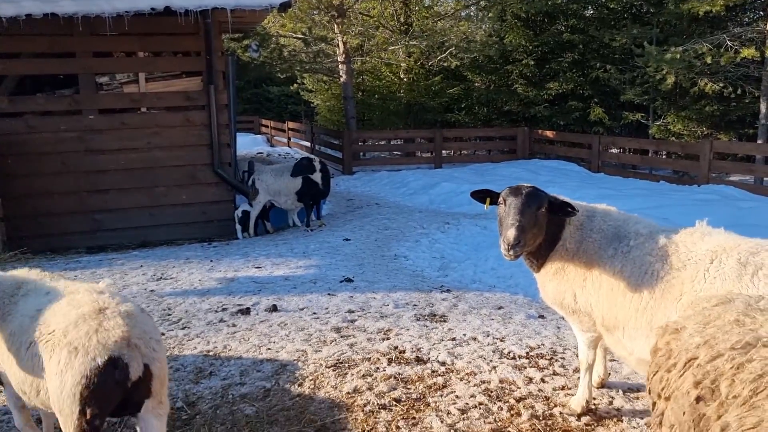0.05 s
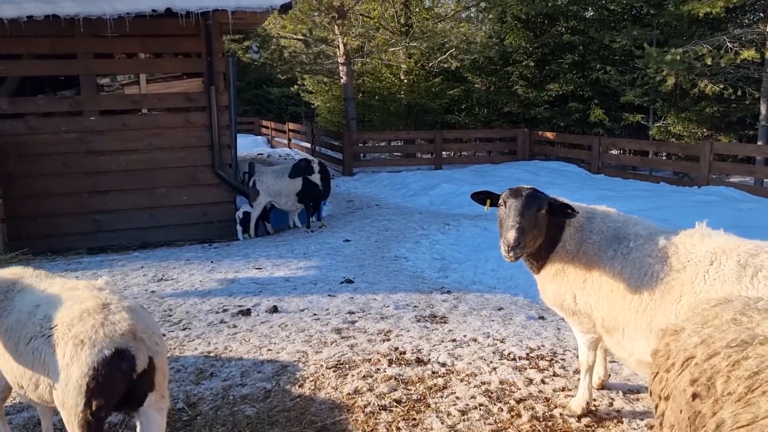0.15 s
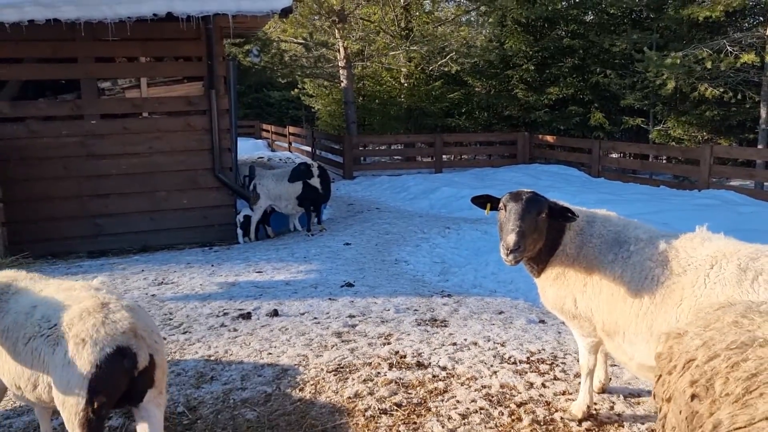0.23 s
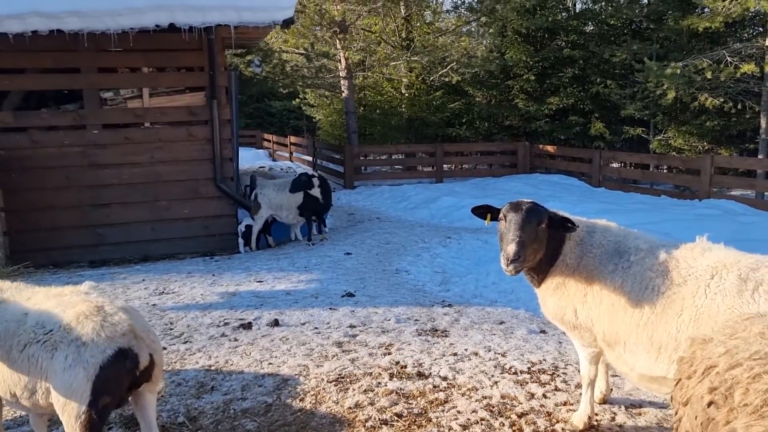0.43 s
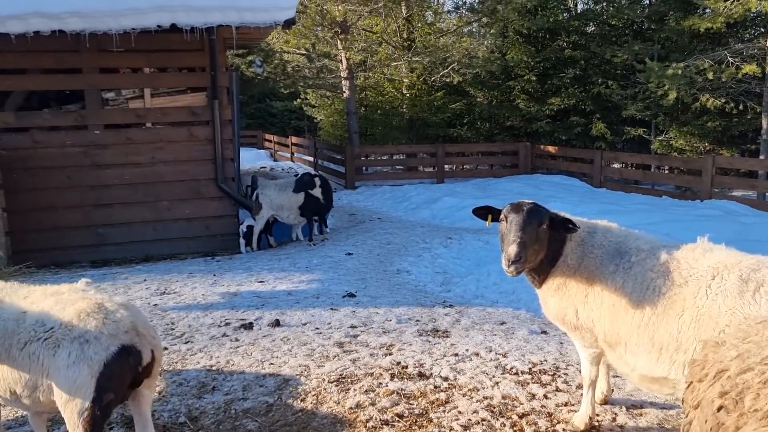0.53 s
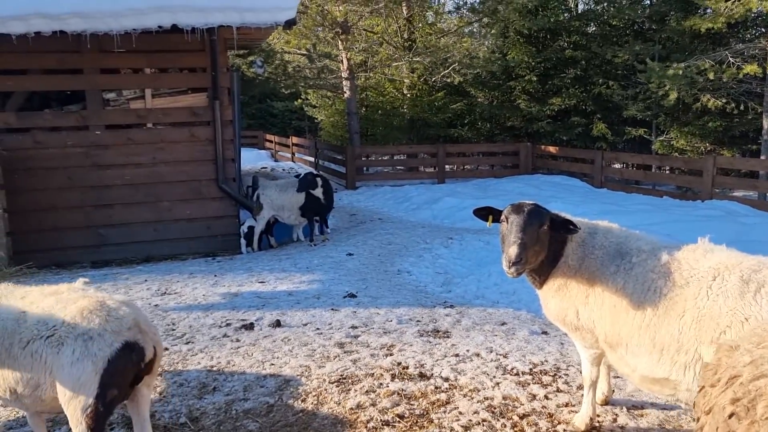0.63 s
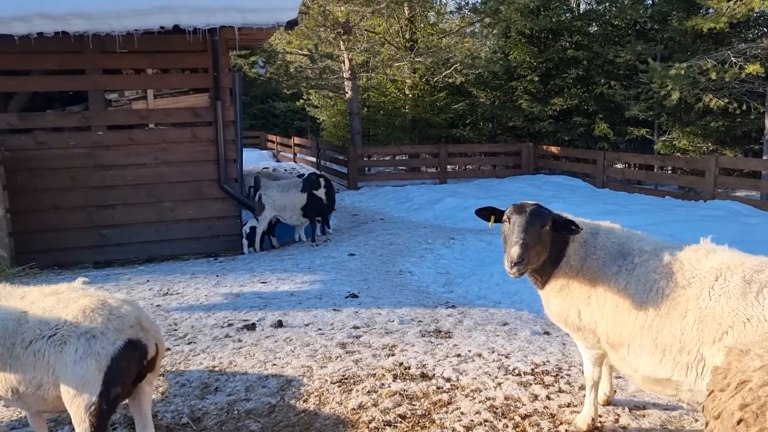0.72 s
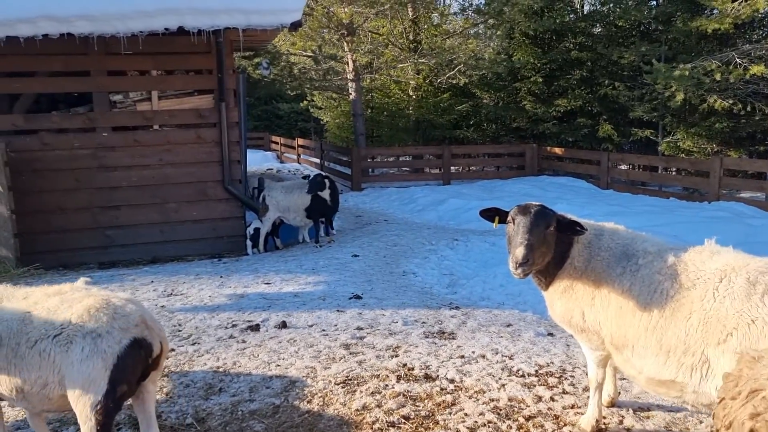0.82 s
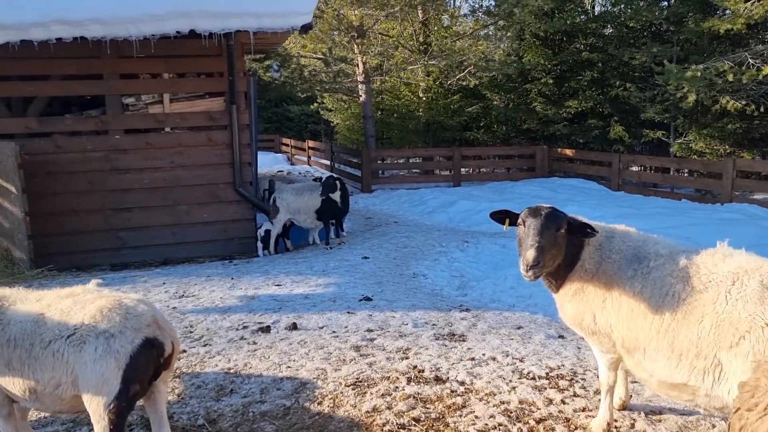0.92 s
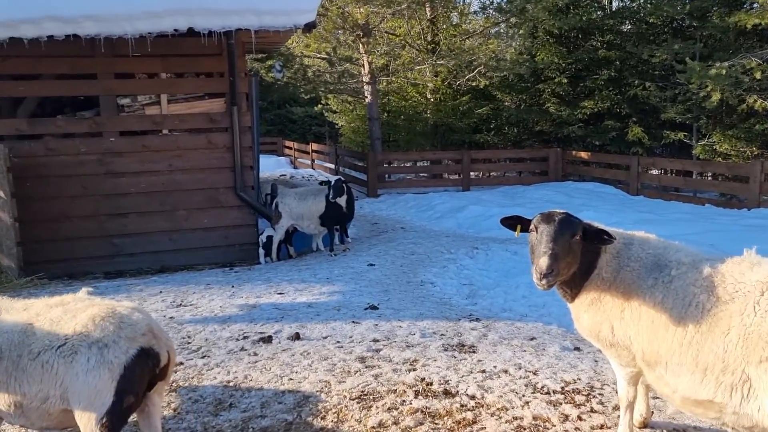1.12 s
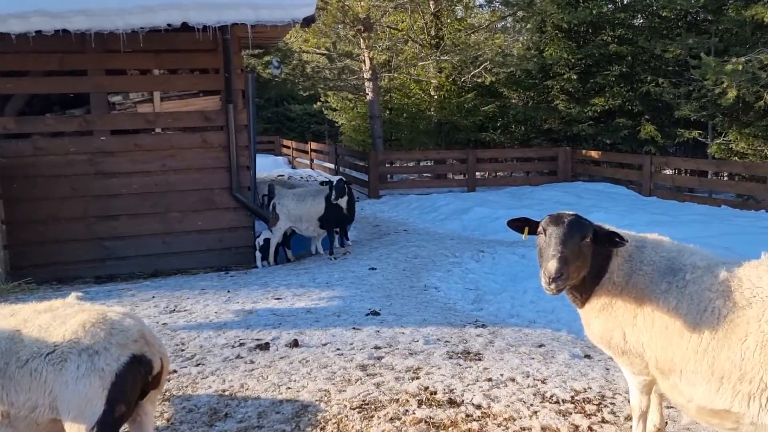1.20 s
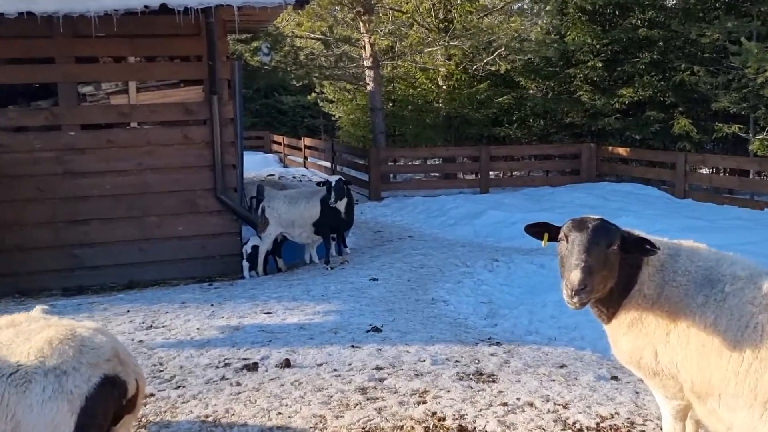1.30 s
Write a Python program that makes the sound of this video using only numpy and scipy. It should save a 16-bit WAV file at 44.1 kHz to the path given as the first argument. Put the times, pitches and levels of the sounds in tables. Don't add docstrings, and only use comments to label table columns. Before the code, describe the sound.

One shaky, nasal sheep bleat breaks out over crisp snow crunches in a quiet farmyard.

```python
import sys
import numpy as np
from scipy import signal
from scipy.fft import rfft, irfft
from scipy.io import wavfile
from scipy.ndimage import map_coordinates

SR = 44100
rng = np.random.default_rng(int(sys.argv[2]) if len(sys.argv) > 2 else 0)


def generate_wav(signal):
    frames = np.transpose(np.atleast_2d(signal))
    scaled = np.clip(frames, -1, 1) * 32767
    pcm = np.round(scaled).astype(np.int16)
    wavfile.write(sys.argv[1], SR, pcm)


def boost(x):
    u = np.asarray(x, float) / 20
    return 10 ** u


N = 59535

# time [s], pitch [Hz], mouth [0 closed, 1 open, 2 wide], half-cycle slap share [0-1],
# roughness [0-1]
VOICE = [(.1, 166, 0.034, 0.26, 0.21), (.16, 170.6, 0.018, 1, 0.5), (.215, 174.9, 0.084, 0.7, 0.5),
         (.235, 177.7, 0.78, 0, 0.4), (.29, 177, 0.99, 0, 0.5), (.33, 177.4, 1.044, 0.4, 0.73),
         (.37, 163.2, 0.98, 0.69, 0.56), (.41, 184.7, 1.068, 0.45, 0.18), (.45, 166.3, 1.026, 0.32, 0.5),
         (.49, 180.6, 1.107, 0.6, 0.37), (.55, 167.7, 1.098, 0.767, 0.5), (.6, 150.4, 1.02, 0.049, 0.3),
         (.66, 139.1, 1.2, 0.65, 0.4), (.70, 132.7, 1.28, 0.083, 0.5), (.735, 141.7, 1.55, 0.55, .2),
         (.775, 144.7, 1.87, 0.87, 0.3), (.8, 151.5, 1.92, 0.78, 0), (.83, 134.4, 1.815, 0.86, 0.5),
         (.88, 143.8, 1.872, 1, 0.33), (.96, 129.5, 1.786, 0.4, 0.22)]


def unit(x):
    return x / np.sqrt(np.mean(x ** 2) + 1e-20)


def at(rows, s):
    x, *cols = np.transpose(rows)
    return [np.interp(s, x, c) for c in cols]


def lay(s, waves):
    where = np.floor(s * SR).astype(int)[:, None] + np.arange(waves.shape[1])
    return np.bincount(np.clip(where, 0, N).ravel(), waves.ravel(), N + 1)[:N]


def since(s, count):
    return np.maximum(np.arange(count) / SR - (s * SR % 1)[:, None] / SR, 0)


def wobble(rate):
    return map_coordinates(rng.standard_normal(200), [np.arange(N) * rate / SR])


def noise(spectrum, alike):
    hz, db = np.transpose(spectrum)
    gain = boost(np.interp(np.log(np.fft.rfftfreq(N, 1 / SR) + 1), np.log(hz), db))
    a, b = irfft(rfft(rng.standard_normal((2, N))) * gain, N)
    angle = np.arccos(np.clip(alike, -1, 1)) / 2
    return unit(np.array([np.cos(angle) * a + np.sin(angle) * b, np.cos(angle) * a - np.sin(angle) * b]))


def air():
    # frequency_hz, level_db [dB per Hz]
    hiss_spectrum = [(25, -46), (86, -6), (170, -21.5), (500, -25.5), (1500, -31), (3500, -24),
                     (7000, -24.5), (10000, -38), (15000, -28.5)]
    wind_spectrum = [(25, -53.5), (50, -17), (80, -12.5), (130, -14.5), (250, -22), (600, -79.5)]
    # time_s, level_db
    gust_levels = [
        (0, -53),
        (.65, -48.5),
        (.8, -63),
    ]
    gust = boost(at(gust_levels, np.arange(N) / SR)[0] + 1.8 * wobble(31))
    rustle = boost(-61 + 1.2 * wobble(40))
    return rustle * noise(hiss_spectrum, alike=.3) + gust * noise(wind_spectrum, alike=.15)


def yard(x):
    t60_s, delay_samples = 0.097, 130
    t = np.arange(SR // 4) / SR
    tail = rng.standard_normal((2, len(t))) * boost(-60 * t / t60_s)
    late = np.pad(x, ((0, 0), (delay_samples, 0)))
    return signal.fftconvolve(late, tail / np.linalg.norm(tail[0]), axes=1)[:, :N]


def hooves():
    # start_s, level_db, length_s, grain_pitch_hz
    crunches = [(0.019, -43.5, 0.004, 8700), (.225, -40.5, 0.057, 9000), (0.321, -29, 0.03, 6000),
                (0.359, -34, .03, 10500), (0.482, -31.5, 0.029, 12000), (0.555, -34, 0.017, 11600),
                (0.679, -35, 0.0047, 11000), (0.808, -26, 0.014, 7140), (0.765, -35, 0.036, 12300),
                (0.858, -31, 0.049, 12500), (0.92, -38.5, 0.033, 11580), (1.053, -59, 0.0075, 2831),
                (1.141, -41, 0.014, 4145), (1.17, -48, 0.011, 3960), (1.197, -50, 0.03, 5960),
                (1.202, -63.5, .015, 700), (1.271, -61.5, 0.0037, 2190), (1.008, -48.5, 0.04, 4500),
                (1.316, -59.5, 0.014, 855), (1.337, -56, 0.009, 900)]
    # start_s, level_db, pitch_hz
    thuds = [
        (0.55, -20, 350),
        (0.641, -24.5, 242),
        (.65, -29.5, 88),
    ]
    out = np.zeros((2, N))
    for start_s, db, length_s, pitch_hz in crunches:
        luck = rng.random((40, 4))
        grain_s = start_s + length_s * luck[:, 0]
        hz = np.minimum(pitch_hz * np.exp(.9 * (luck[:, 1:2] - .5)), SR / 2.5)
        for ch in range(2):
            arrival_s = grain_s + ch * .00025
            t = since(arrival_s, count=200)
            grain = np.sin(2 * np.pi * hz * t) * np.exp(-t * hz / 3)
            out[ch] += lay(arrival_s, boost(db - 5 - 12 * luck[:, 2 + ch:3 + ch]) * grain)
    t = np.arange(N) / SR
    for start_s, db, hz in thuds:
        cycles = np.maximum(t - start_s, 0) * hz
        thud = cycles * np.exp(-cycles / 0.72) * np.sin(2 * np.pi * cycles)
        out += boost(db) * thud * boost([[-3], [3]])
    return out


def ticks():
    # start_s, level_db, pitch_hz
    snaps = [(0.0188, -46.5, 4700), (0.1075, -40.5, 5970), (0.173, -47, 2800), (0.2109, -41.5, 4520),
             (.2289, -34.5, 7400), (0.273, -44, 7270), (0.3071, -25, 5830), (0.249, -44.5, 8280),
             (.262, -47.5, 13000), (.819, -26.5, 6500), (.8205, -41, 12000), (1.0118, -50, 4500),
             (1.03, -51, 3970), (1.0619, -46.5, 3500), (1.107, -50.5, 11800), (1.1135, -50.5, 8840),
             (1.134, -56, 12000), (1.1442, -44, 2900), (1.153, -62.5, 4500), (1.1728, -50, 3660),
             (1.1969, -47, 5660), (1.2, -65, 4500), (1.2098, -42.5, 1970), (1.2067, -39, 6960),
             (1.235, -55.5, 9010), (1.263, -70.5, 4300), (1.2676, -57.5, 3000), (1.2791, -44.5, 5800),
             (1.2806, -57.5, 11860), (1.3255, -74, 5050), (1.342, -66, 2440)]
    burst_s, pitch_spread = .0015, 1.1
    s, db, hz = (np.repeat(c, 8)[:, None] for c in np.transpose(snaps))
    luck = rng.random((len(s), 4))
    s = (s + burst_s * luck[:, :1] ** 2)[:, 0]
    hz = np.minimum(hz * np.exp(pitch_spread * (luck[:, 1:2] - .5)), SR / 2.6)
    t = since(s, count=120)
    ring = np.sin(2 * np.pi * hz * t) * np.exp(-t * hz / 4)
    return np.array([lay(s + ch * .0003, boost(db - 3 - 8 * luck[:, 2 + ch:3 + ch]) * ring) for ch in range(2)])


def tremble(s, held_db):
    # peak_s, level_db, rise_s, fall_s
    swells = [(0.202, -38, 0.0084, 0.0071), (0.233, -30.5, 0.01, 0.0066), (0.246, -24, 0.013, 0.0046),
              (0.266, -34.5, 0.0063, 0.0078), (0.286, -40.5, 0.0046, 0.0088),
              (0.313, -11.5, 0.0075, 0.0015), (0.325, -12, 0.0042, 0.0097), (0.343, -48, 0.013, 0.0039),
              (0.411, -10, 0.016, 0.0048), (0.49, -9.5, 0.017, 0.0035), (0.563, -15, 0.019, 0.0078),
              (0.648, -22.5, 0.024, 0.033), (0.689, -52, 0.0098, 0.0045), (0.734, -34, 0.0065, 0.0039),
              (0.763, -45.5, 0.011, .01), (0.807, -25, 0.02, 0.0026), (0.824, -69, 0.012, 0.0074),
              (0.887, -26.5, 0.034, 0.0037), (0.943, -31.5, 0.018, 0.0084)]
    # time_s, level_db
    effort = [(0, -26.5), (.14, -35.5), (.17, -67), (.24, -94), (.29, -52.5), (.4, -36), (.53, -32),
              (.605, -29), (.70, -57.5), (.75, -49), (.83, -51.5), (.93, -50.5), (.98, -118)]
    pressure = boost(at(effort, s)[0] + held_db)
    for peak_s, db, rise_s, fall_s in swells:
        pressure = pressure + boost(db) * np.exp(-.5 * ((s - peak_s) / np.where(s < peak_s, rise_s, fall_s)) ** 2)
    return pressure


def hum():
    # time_s, pitch_hz, level_db
    nasal_tone = [(0, 168.3, -46.5), (.07, 162.7, -50.5), (.12, 170, -33.5), (.17, 170.2, -59),
                  (.22, 177.3, -33.5), (.275, 176.7, -56.5), (.33, 176, -51.5), (.56, 177.8, -53),
                  (.64, 241.8, -53), (.69, 245.5, -50.5), (.735, 291.4, -34), (.8, 298, -53),
                  (.95, 232, -51), (1.01, 202, -66.5)]
    swell_share = 0.72
    t = np.arange(N) / SR
    hz, db = at(nasal_tone, t)
    calling = (tremble(t, held_db=5) * boost(25)) ** swell_share
    creaking = boost(4 * wobble(30))
    swell = np.where(t > .18, calling, creaking)
    ahead_ms = np.interp(at(VOICE, t)[1], [1, 2], [0.041, 0.94])
    shift = np.pi * hz * ahead_ms / 1000
    level = boost(db + 4.5 * wobble(70.74))
    phase = 2 * np.pi * np.cumsum(hz * (1 + .04 * wobble(90))) / SR
    return level * swell * np.sin(phase + np.array([shift, -shift]))


def folds():
    jitter, shimmer_db = .065, 3.5
    rasp_db, rasp_per_s, rasp_gate = -13, 1500, 0.85
    t = np.arange(N) / SR
    turns = np.cumsum(at(VOICE, t)[0]) / SR
    k = np.arange(2 * int(turns[-1]))
    slap_s = np.interp(k / 2, turns, t)
    hz, _, half, rough = at(VOICE, slap_s)
    luck = rng.standard_normal((len(k), 2))
    size = np.where(k % 2, half, 1) * boost(shimmer_db * rough * luck[:, 1])
    slap_s = slap_s + jitter * rough * luck[:, 0] / hz

    puffs = rng.standard_normal((1500, 2))
    puff_s = (np.arange(len(puffs)) + .5 * puffs[:, 0]) / rasp_per_s
    gate = 2 * np.exp(-rasp_gate * (np.interp(puff_s, t, turns) % 1))
    puff_size = boost(rasp_db) * at(VOICE, puff_s)[3] * puffs[:, 1] * gate
    airy = np.r_[np.zeros(len(slap_s)), np.ones(len(puff_s))]
    return np.r_[slap_s, puff_s], np.r_[size, puff_size], airy


def bleat():
    # start_s, level_db
    creak_slaps = [(0.0161, -32.5), (0.023, -39.5), (0.0357, -33.5), (0.04, -73), (.063, -36.5),
                   (0.068, -61), (0.0907, -31), (0.094, -40), (0.108, -32), (0.1125, -29.5), (0.118, -61),
                   (0.125, -28.5), (0.1312, -28.5), (.138, -34.5), (.146, -50)]
    # frequency_hz, width_hz, level_db
    closed_mouth = [(576, 237, 6.5), (1037, 70, 4.5), (1450, 57, -7), (1840, 71, -7), (2340, 50, -15),
                    (2900, 380, -35.5), (4500, 320, -13), (5550, 450, -27.5), (6600, 900, -32),
                    (10500, 2000, -42.5)]
    # frequency_hz, width_hz, level_db, left_over_right_db, left_ahead_ms
    open_mouth = [(570, 50.5, -3.5, 7, 0.45), (1124, 96, -7.5, 0.5, 0.33), (1590, 52.5, 5.5, 2, 0.16),
                  (1835, 207, 7, -5, 0.17), (2300, 170, -7.5, 1.5, 0.47), (3040, 680, -25.5, 0.5, 0.34),
                  (4590, 560, -23.5, -3.5, 0.28), (5800, 400, -18, -4, 0.39), (6920, 1600, -9, -7, .45),
                  (9150, 1400, -27.5, -1, 0.2)]
    wide_mouth = [(650, 100, 4.5, 3.5, 0.61), (1300, 240, 0.5, -2, 0.38), (1813, 140, -13.5, -11.5, 0.61),
                  (2085, 200, 3, -2, 0.41), (2410, 530, -12, -8.5, .5), (3500, 550, 13, 0.5, 0.872),
                  (4270, 520, -1.5, -7, 0.792), (5350, 210, -3, 0.5, 0.81), (7280, 610, -0.5, -3.5, 0.458),
                  (14130, 1700, -3, -4.5, 0.57)]
    late_s = [0.00033, 0.0022, 0.00035, 0.00047, .014, 0.0068, 0.00028, 0.018, 0.0018, 0.016]
    held_levels = [-26, -19, -24.5, -2, 22, 18, 28, 3.5, 19, 18.5]
    arrival_power = [0.92, 0.93, 0.69, 1.2, 0.63, 0.4, 2, 2.5, 1.5, 1.5]
    onset_s, throat_cut_hz = .0003, 488
    lift_s, lift_share = .9, 0.16

    s, size, airy = folds()
    keep = ((s > .17) | (airy > 0)) & (s < 1) & (size != 0)
    creak_s, creak_db = np.transpose(creak_slaps)
    size = size[keep]
    voiced = len(size)
    s = np.r_[s[keep], creak_s]
    airy = np.r_[airy[keep], 0 * creak_s][:, None]
    mouth = at(VOICE, s)[1]
    opening, widening = np.minimum(mouth, 1), np.maximum(mouth - 1, 0)
    out = np.zeros((2, N))
    for k, (closed, opened, wide) in enumerate(zip(closed_mouth, open_mouth, wide_mouth)):
        shapes = np.c_[range(3), [(*closed, *opened[3:]), opened, wide]]
        hz, width_hz, _, pan_db, ahead_ms = (c[:, None] for c in at(shapes, mouth))
        db = at(shapes, opening + widening ** arrival_power[k])[2][:, None]
        if k == 0:
            hz = hz * (1 + lift_share * np.clip((s[:, None] - lift_s) / 0.048, 0, 1))
        breath = tremble(s[:voiced] - late_s[k], held_levels[k] * opening[:voiced])
        push = np.r_[size * breath, boost(creak_db)][:, None]
        push = push * np.maximum(hz / 2000, 1) ** airy
        count = 700 if k < 5 else 250
        fade = np.hanning(2 * count)[count:]
        for ch, side in enumerate((-.5, .5)):
            start_s = s + side * ahead_ms[:, 0] / 1000 + .0004
            t = since(start_s, count)
            ring = np.sin(2 * np.pi * hz * t) * np.exp(-np.pi * width_hz * t) * (1 - np.exp(-t / onset_s)) ** 2
            out[ch] += lay(start_s, (-1) ** k * push * boost(db - side * pan_db) * ring * fade)
    return signal.sosfilt(signal.butter(4, throat_cut_hz, "high", fs=SR, output="sos"), out)


def scene():
    near = bleat() + hum() + hooves() + ticks()
    return near + boost(-12.5) * yard(near) + air()


def roll_off(x):
    return signal.sosfilt(signal.butter(12, 15900, fs=SR, output="sos"), x)


def record(dry):
    top_hz, ceiling = 15850, 1.05
    kept = irfft(rfft(dry) * (np.fft.rfftfreq(N, 1 / SR) < top_hz), N)
    mix = kept / (1 + np.abs(kept / ceiling) ** 4) ** .25
    return roll_off(mix)


dry = scene()
out = record(dry)
generate_wav(out)
```